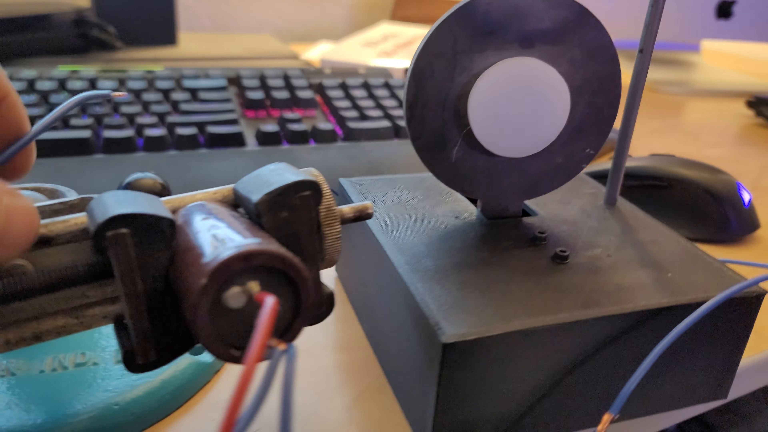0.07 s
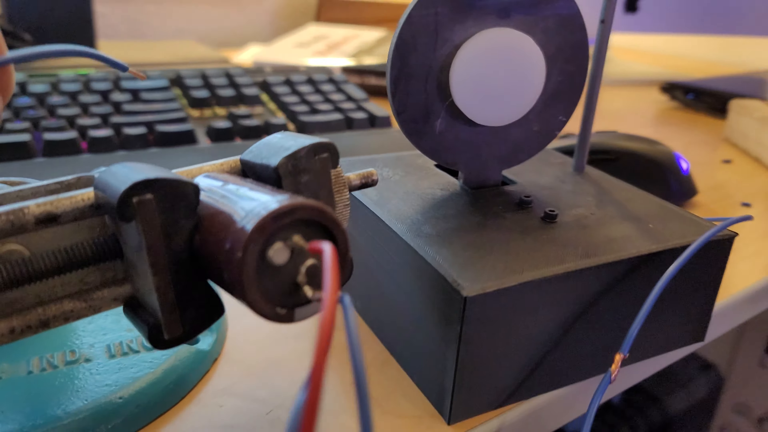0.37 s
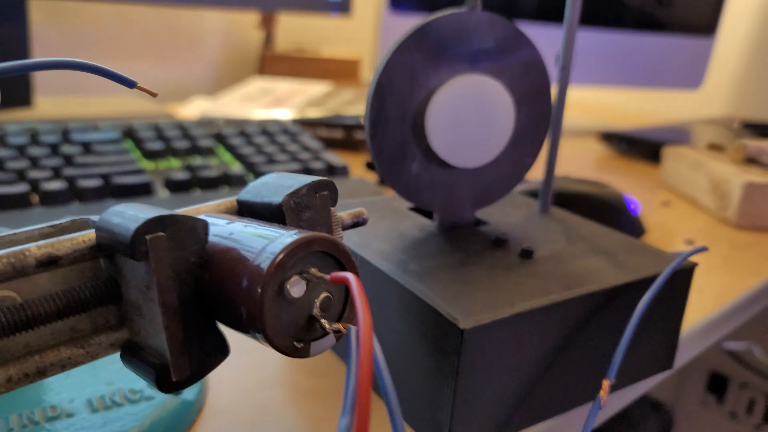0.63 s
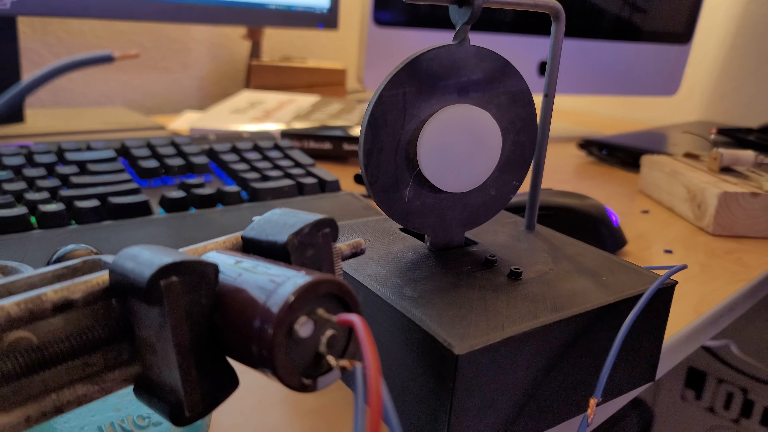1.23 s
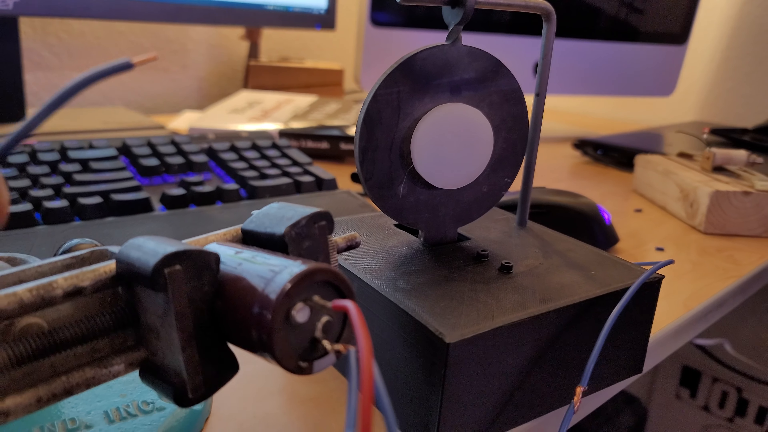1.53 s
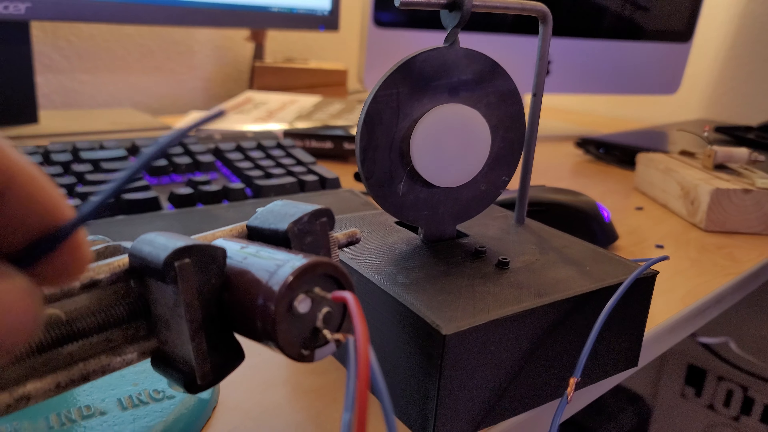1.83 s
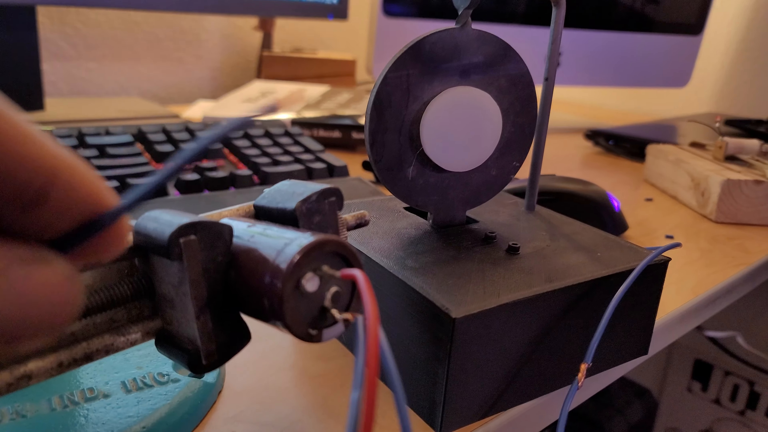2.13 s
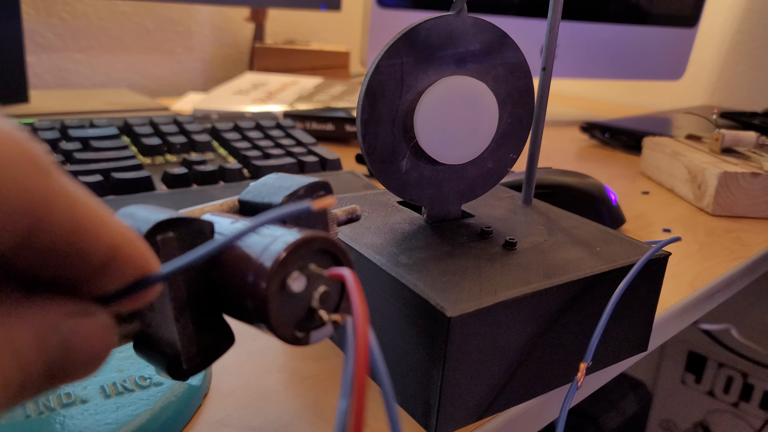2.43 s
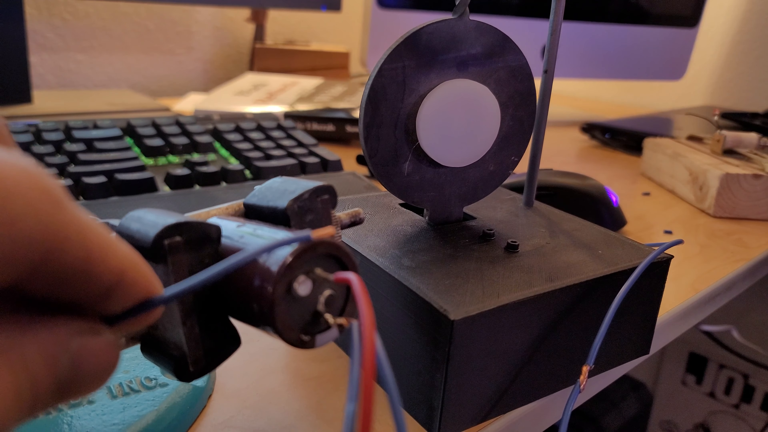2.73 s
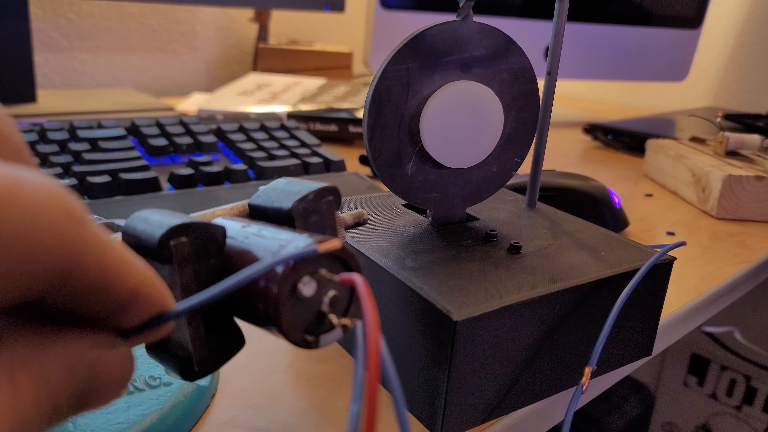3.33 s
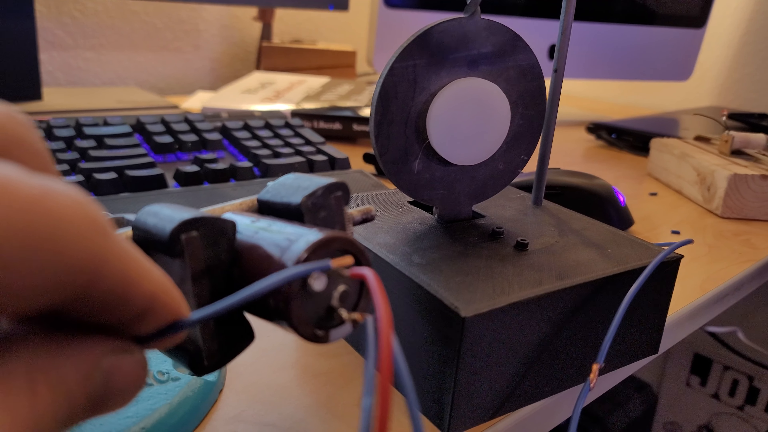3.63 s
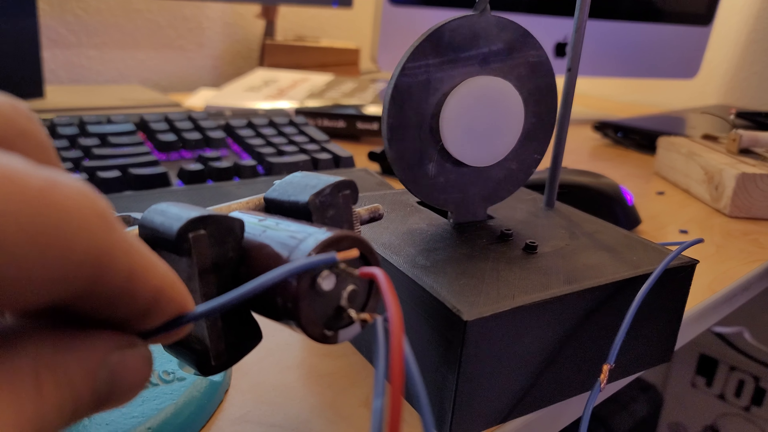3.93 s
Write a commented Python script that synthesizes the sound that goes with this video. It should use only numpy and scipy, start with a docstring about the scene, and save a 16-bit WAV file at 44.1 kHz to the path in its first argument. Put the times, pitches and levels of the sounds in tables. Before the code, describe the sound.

A sharp electrical snap sounds close by as a wire touches a capacitor, after a stretch of faint fan hum and thin whine. A hanging metal disc rings briefly and knocks on its mount in a small room.

```python
"""A fan, a hum and a thin electrical whine run throughout; at first a hand shifts softly and a hiss fades.
Near 3.7 s a wire touches a charged capacitor on a desk: a spark spits, then the discharge cracks.
The crack kicks a hanging metal disc, which rings with its box into a small room as the desk thuds.
The swinging mount knocks four times and chokes the ring as it returns."""
import sys
import numpy as np
from scipy import signal
from scipy.fft import rfft, irfft
from scipy.io import wavfile
from scipy.ndimage import uniform_filter1d

SR = 44100
rng = np.random.default_rng(int(sys.argv[2]) if len(sys.argv) > 2 else 0)


def file_out(sig):
    """Save sig as 16-bit WAV at sys.argv[1]."""
    # one column per channel
    cols = np.atleast_2d(sig).T
    # limit, then scale
    lim = np.clip(cols, -1, 1)
    pcm = np.round(lim * 32767).astype(np.int16)
    wavfile.write(sys.argv[1], SR, pcm)


N = 176400
TIME, FREQS = np.arange(N) / SR, np.maximum(np.fft.rfftfreq(N, 1 / SR), 1)
CRACK_S, ATTACK_S, CUTOFF_HZ = 3.6884, 0.001, 15800


def from_db(db):
    """Decibels to gain."""
    return 10 ** (np.asarray(db) / 20)


def unit_rms(x):
    """Scale to rms 1."""
    return x / np.sqrt(np.mean(x ** 2) + 1e-20)


def per_bin(curve):
    """Interpolate a table over log frequency; a scalar holds everywhere."""
    if np.ndim(curve) == 0:
        return curve
    hz, values = np.array(curve).T
    return np.interp(np.log(FREQS), np.log(hz), values)


def pan(pan_db):
    """Constant-power stereo gains; pan_db is left minus right."""
    gains = from_db(np.array([[.5], [-.5]]) * pan_db)
    return gains / np.sqrt(np.mean(gains ** 2, axis=0))


def drift(rate_hz):
    """Low-passed random wander, rms 1."""
    return unit_rms(irfft(rfft(rng.standard_normal(N)) / (1 + (FREQS / rate_hz) ** 2), N))


def noise(spectrum, pan_db=0, correlation=0):
    """Stereo noise of given spectrum, balance and left-right correlation, rms 1."""
    mid, side = rfft(rng.standard_normal((2, N)))
    alike = np.clip(per_bin(correlation), -1, 1)
    stereo = np.sqrt(1 + alike) * mid + np.sqrt(1 - alike) * side * [[1], [-1]]
    shaped = stereo * from_db(per_bin(spectrum)) * pan(per_bin(pan_db))
    return unit_rms(irfft(shaped * (FREQS < CUTOFF_HZ), N))


def envelope(start_s, rise_s, hold_s, t60_s):
    """Linear rise, hold, exponential decay."""
    age_s = TIME - start_s
    decay_db = -60 * np.clip((age_s - rise_s - hold_s) / t60_s, 0, 3)
    return np.clip(age_s / rise_s, 0, 1) * from_db(decay_db)


def tone(hz, left_lead_rad=0, waver_rad=0):
    """Stereo sine with a phase offset between channels, rms 1."""
    phase = 2 * np.pi * (hz * TIME + rng.random()) + waver_rad
    return np.sqrt(2) * np.sin(phase + left_lead_rad * np.array([[.5], [-.5]]))


# Fan noise: freq_hz, density_db
FAN_SPECTRUM = [(15, -44), (25, -23), (49, -5.5), (82, -7.5), (119, -2.5), (152, -7), (268, -2.5),
                (391, -7.5), (448, -6.5), (556, -13.5), (636, -8), (768, -12), (1060, -13.5), (1150, -13.5),
                (1250, -15.5), (1630, -11), (2030, -17.5), (2320, -11.5), (3120, -12.5), (3390, -18),
                (3670, -18.5), (5970, -24), (9430, -38.5), (12400, -37.5), (15800, -43)]
# Fan and hand balance: freq_hz, pan_db
AMBIENT_PAN = [(60, 8), (130, 6), (290, 3.5), (640, 4), (1400, 2), (2100, -1.5), (3100, -4), (4400, -4),
               (5900, -2), (7000, -2), (7900, 13), (9200, 4), (11000, -1.5), (15000, 11)]
# Fan and hand stereo image: freq_hz, correlation
AMBIENT_CORRELATION = [(60, 0.75), (150, 0.81), (380, 0.2), (950, -0.39), (2380, -0.23), (5980, -0.18),
                       (15000, 0.01)]
def fan():
    """Steady fan noise."""
    return from_db(-51.5) * noise(FAN_SPECTRUM, AMBIENT_PAN, AMBIENT_CORRELATION)


# Hand rustle: freq_hz, density_db
HAND_SPECTRUM = [(60, -23), (200, -8), (400, 3), (650, -9), (1500, -18), (8000, -45)]
def hand():
    """A hand shifts softly at the start."""
    gain = from_db(-57.5) * envelope(start_s=0, rise_s=0.019, hold_s=0.21, t60_s=0.66)
    return gain * noise(HAND_SPECTRUM, AMBIENT_PAN, AMBIENT_CORRELATION)


def hiss(low_edge_hz=3500, fade_db_per_s=8):
    """Faint hiss, sinking away."""
    spectrum = [(5000, 2.5), (6800, 0.5), (8000, -17), (15000, -12.5)]  # freq_hz, density_db
    highpass = signal.butter(2, low_edge_hz, "high", fs=SR, output="sos")
    treble = unit_rms(signal.sosfilt(highpass, noise(spectrum)))
    return from_db(-62 - fade_db_per_s * TIME) * treble


# Hum lines: pitch_hz, level_db, pan_db
HUM_LINES = [(119.5, -67.5, 3), (267.5, -71, 4), (1405, -72.5, 10), (1700, -76, 3), (2567, -70, -9),
             (2790, -78, -2)]
def hum(waver_db=3, waver_rad=0.7):
    """Mains and fan hum, wavering in level and phase."""
    out = 0
    for hz, level_db, pan_db in HUM_LINES:
        gain = from_db(level_db + waver_db * drift(rate_hz=3.6))
        out += gain * pan(pan_db) * tone(hz, waver_rad=waver_rad * drift(rate_hz=4))
    return out


# Whine harmonics, fundamental first: level_db, pan_db, left_lead_rad
WHINE_HARMONICS = [(-61.5, -3, 0.68), (-65.5, -2, 1.66), (-66, 0.5, 1.06), (-76, -5, 1.3), (-79.5, -6.5, 0),
                   (-84, -3, 0), (-87, 10.5, 0)]
def whine(pitch_hz=1150.9, start_db=-5, rise_s=1, waver_db=0.84):
    """Thin electrical whine: swells, then holds with a slight waver."""
    swell_db = start_db * np.clip(1 - TIME / rise_s, 0, 1)
    out = 0
    for harmonic, (level_db, pan_db, lead_rad) in enumerate(WHINE_HARMONICS, 1):
        gain = from_db(level_db + swell_db + waver_db * drift(rate_hz=1.5))
        out += gain * pan(pan_db) * tone(harmonic * pitch_hz, lead_rad)
    return out


# Reflections: freq_hz, density_db
REVERB_SPECTRUM = [(150, -14), (400, -10), (650, 6.5), (950, -2), (1600, -3.5), (2300, -9), (3050, 0),
                   (3400, 1.5), (3700, -10), (4200, -1.5), (5100, -10), (6100, -2), (7150, -12.5),
                   (8000, -10), (9300, -16.5), (10200, -10.5), (12500, -8.5), (14500, -16), (15200, -20),
                   (15800, -37)]
# Their balance: freq_hz, pan_db
REVERB_PAN = [(200, 10), (700, 4.5), (1500, 1), (3100, 0), (5500, -5), (8000, -0.5), (14000, 0)]
# Their stereo image: freq_hz, correlation
REVERB_CORRELATION = [(150, 0.8), (400, -0.4), (800, -0.2), (3000, -0.39), (6000, -0.1), (15000, 0)]
# Their decay: freq_hz, t60_s
REVERB_DECAY = [(150, 1), (600, 0.6), (1500, 0.35), (3000, 0.33), (6000, 0.32), (14000, 0.2)]
def room():
    """Dense reflections of the crack; the treble dies first."""
    wash = rfft(noise(REVERB_SPECTRUM, REVERB_PAN, REVERB_CORRELATION))
    out = 0
    for centre_hz, t60_s in REVERB_DECAY:
        band = per_bin([(hz, float(hz == centre_hz)) for hz, _ in REVERB_DECAY])  # triangular crossover
        out += irfft(wash * band, N) * envelope(CRACK_S, rise_s=0.01, hold_s=0.038, t60_s=t60_s)
    return from_db(-17.5) * out


# Mount knocks: start_s, level_db, lowpass_hz, t60_s
MOUNT_KNOCKS = [(3.767, -31, 3000, 0.062), (3.816, -29, 700, 0.091), (3.856, -25, 800, 0.085),
                (3.921, -24, 3000, .11)]
# Knock timbre: freq_hz, density_db
KNOCK_SPECTRUM = [(100, -23.5), (280, 0), (430, -8.5), (650, 8), (900, -4.5), (1150, -5), (1700, -10),
                  (2500, -22.5), (4000, -30.5), (15000, -26)]
DESK_CORRELATION = 0.62
def mount():
    """The swinging mount knocks: short noise bursts."""
    out = 0
    for start_s, level_db, lowpass_hz, t60_s in MOUNT_KNOCKS:
        burst = noise(KNOCK_SPECTRUM, pan_db=10.5, correlation=DESK_CORRELATION)
        lowpass = signal.butter(1, lowpass_hz, fs=SR, output="sos")
        knock = unit_rms(signal.sosfilt(lowpass, burst))
        out += from_db(level_db) * envelope(start_s, ATTACK_S, hold_s=0, t60_s=t60_s) * knock
    return out


# Desk thud: freq_hz, density_db
DESK_SPECTRUM = [(30, -21), (60, -4), (100, -13.5), (133, 4), (165, -18), (265, -2), (320, -7.5),
                 (400, 1.5), (550, -8.5), (900, -21.5), (3000, -69.5)]
def desk(coupling_db=-12.5):
    """The recoil thuds through the desk; each knock stirs it again."""
    gain = from_db(-26) * envelope(start_s=3.70, rise_s=0.04, hold_s=0.018, t60_s=0.2)
    for start_s, knock_db, _, _ in MOUNT_KNOCKS:
        stir = from_db(knock_db + coupling_db) * envelope(start_s, ATTACK_S, hold_s=0, t60_s=0.44)
        gain = np.hypot(gain, stir)  # powers add
    return gain * noise(DESK_SPECTRUM, pan_db=3.5, correlation=DESK_CORRELATION)


# Disc and box modes: pitch_hz
DISC_PITCHES_HZ = [644, 722, 749, 1555, 2933, 3104, 4097, 4101, 4299, 5780, 6207, 7526, 11289, 14921]
# Same order: level_db, rise_s, t60_s, pan_db, left_lead_rad
DISC_MODES = [(-29.5, 0.024, .4, 9.5, 0.5), (-16, 0.017, 0.15, 8.5, -4.8), (-19, 0.017, 0.21, 7, -1.5),
              (-30, .012, 0.32, 4, 2), (-26.5, 0.0023, .29, -13, 0), (-31, .002, .26, -11, -5.5),
              (-14.5, .016, .18, 6, 1.5), (-31.5, 0.026, .7, -8, -0.5), (-36, .004, .22, 1, 0),
              (-29, .001, .05, -6.5, 1.5), (-33, 0.037, 0.32, -2, -2), (-27, .03, 0.36, 10, 1.4),
              (-39, .02, 0.27, 5, 1), (-22.5, .028, 0.3, 11, -1.5)]
def disc(hold_s=0.023, waver_db=2.1, choke_s=3.912, choke_db=-12, choke_ramp_s=0.023):
    """The kicked disc and its box ring, each mode wavering, until the returning mount damps them."""
    ring = 0
    for hz, (level_db, rise_s, t60_s, pan_db, lead_rad) in zip(DISC_PITCHES_HZ, DISC_MODES):
        gain = from_db(level_db + waver_db * drift(rate_hz=25))
        ring += gain * envelope(CRACK_S, rise_s, hold_s, t60_s) * pan(pan_db) * tone(hz, lead_rad)
    choke = np.clip((TIME - choke_s) / choke_ramp_s, 0, 1)
    return ring * from_db(choke_db * choke)


# First spark: freq_hz, density_db
SPARK_SPECTRUM = [(240, -42), (400, -15), (1920, -8.5), (2950, -10.5), (3550, -19.5), (4140, 4.5),
                  (4610, -14), (5050, -5), (6170, -16), (7080, -11.5), (8260, 0.5), (9340, -32.5),
                  (10100, -17), (14800, -9), (15800, -21)]
# Its balance: freq_hz, pan_db
SPARK_BALANCE = [(600, 14), (2900, 5), (4100, 27), (6000, 7), (8000, 17.5), (15000, 18)]
def spark():
    """A bright spit as the wire nears the terminal."""
    gain = from_db(-14.5) * envelope(start_s=3.675, rise_s=0.008, hold_s=0.002, t60_s=0.033)
    return gain * noise(SPARK_SPECTRUM, SPARK_BALANCE)


# Main discharge: freq_hz, density_db
CRACK_SPECTRUM = [(240, -48.5), (400, -17), (863, -8), (2340, -22), (3000, 1.5), (3600, -20), (4200, -3),
                  (5210, -19), (5800, 5.5), (6360, -18.5), (7770, -12), (9060, -20), (13300, -17.5),
                  (15000, -27), (15800, -34.5)]
# Its balance: freq_hz, pan_db
CRACK_BALANCE = [(800, -4), (1600, -3), (3000, -13.5), (5800, -3.5), (8200, 7), (14000, 1.5)]
def crack():
    """The capacitor discharges fully in one sharp burst."""
    gain = from_db(-7.5) * envelope(CRACK_S, ATTACK_S, hold_s=0.0019, t60_s=0.032)
    return gain * noise(CRACK_SPECTRUM, CRACK_BALANCE)


def scene():
    """Stereo sum of all sources."""
    background = fan() + hiss() + hand() + hum() + whine()
    return background + spark() + crack() + room() + disc() + mount() + desk()


LIMIT_DB, RELEASE_DB_PER_S, DETECTOR_S, DUCK_LAG_S = -17, 0.5, 0.05, 0.054
def record(dry):
    """Gain control ducks just after the crack and recovers slowly; soft clip, then low-pass."""
    power = uniform_filter1d(np.mean(dry ** 2, axis=0), int(DETECTOR_S * SR))
    over_db = np.maximum(10 * np.log10(np.maximum(power, 1e-12)) - LIMIT_DB, 0)
    release_db = RELEASE_DB_PER_S * TIME
    duck_db = np.maximum.accumulate(over_db + release_db) - release_db
    pole = np.exp(-1 / (DUCK_LAG_S * SR))
    ducked = dry * from_db(-signal.lfilter([1 - pole], [1, -pole], duck_db))
    rounded = ducked / (1 + ducked ** 6) ** (1 / 6)
    lowpass = signal.ellip(12, .1, 80, CUTOFF_HZ, fs=SR, output="sos")
    return signal.sosfilt(lowpass, rounded)


dry = scene()
out = record(dry)
file_out(out)
```